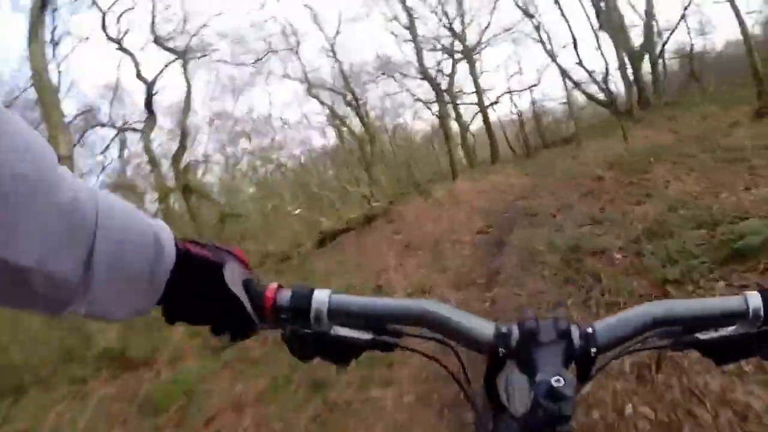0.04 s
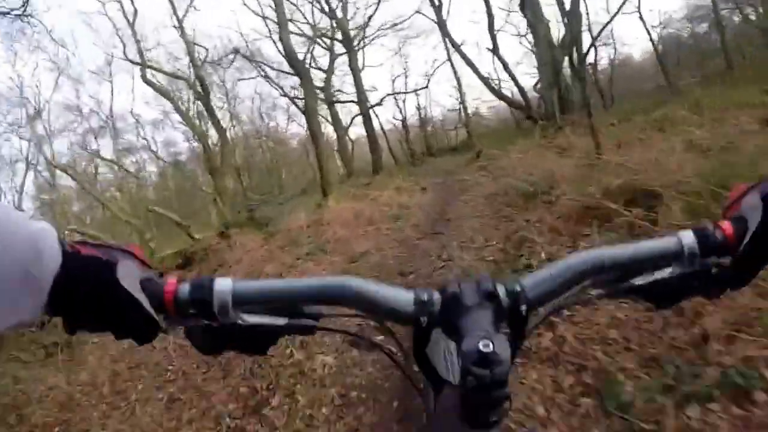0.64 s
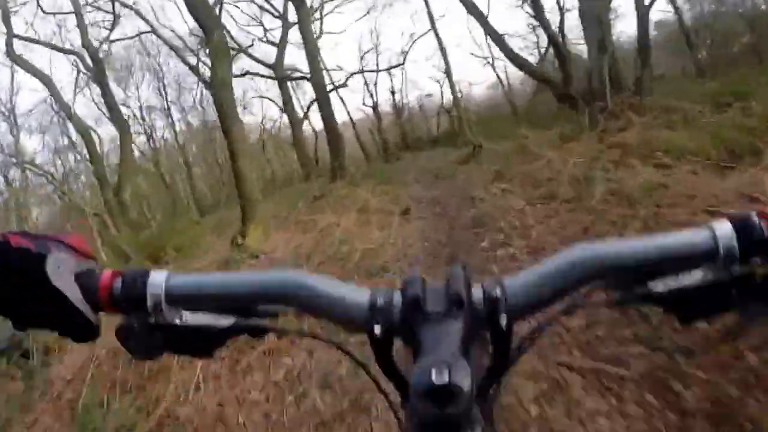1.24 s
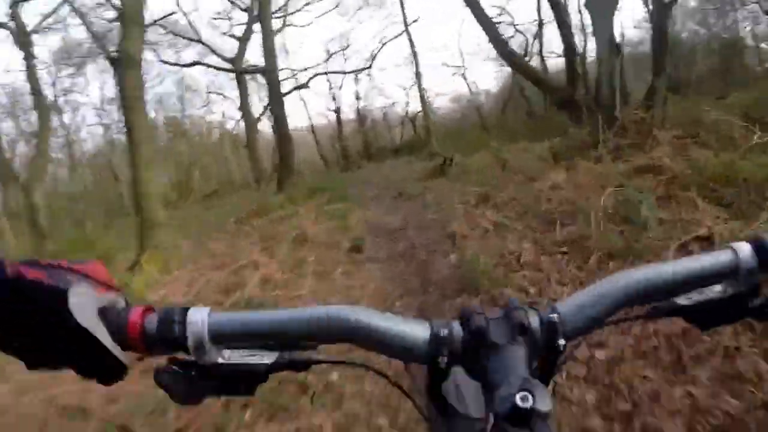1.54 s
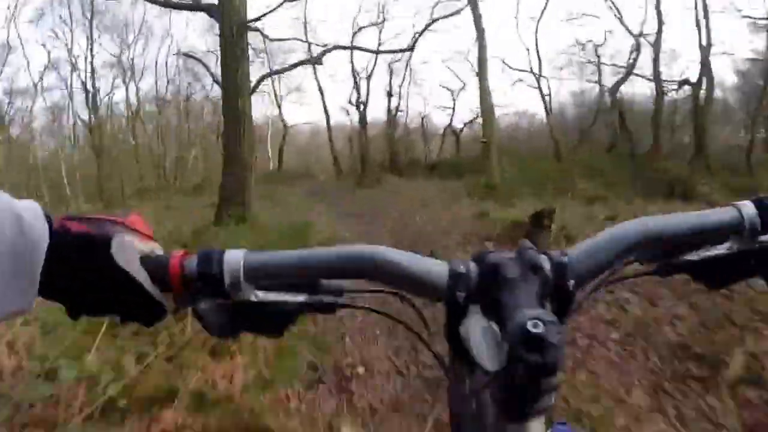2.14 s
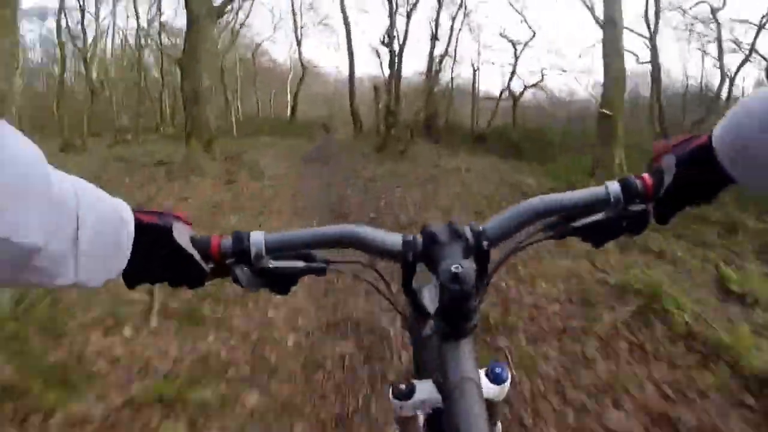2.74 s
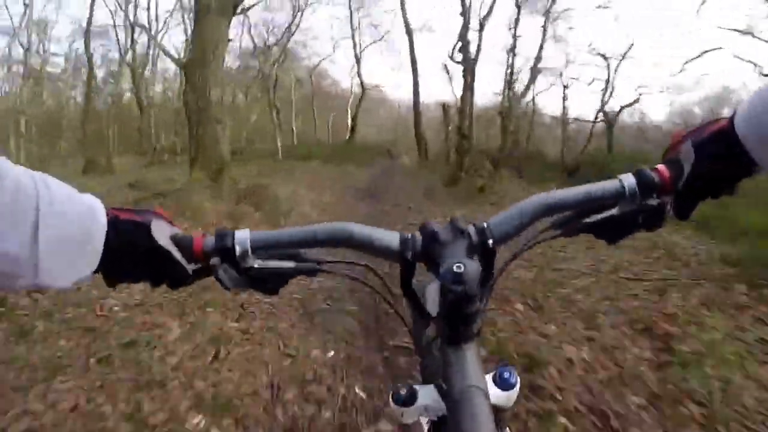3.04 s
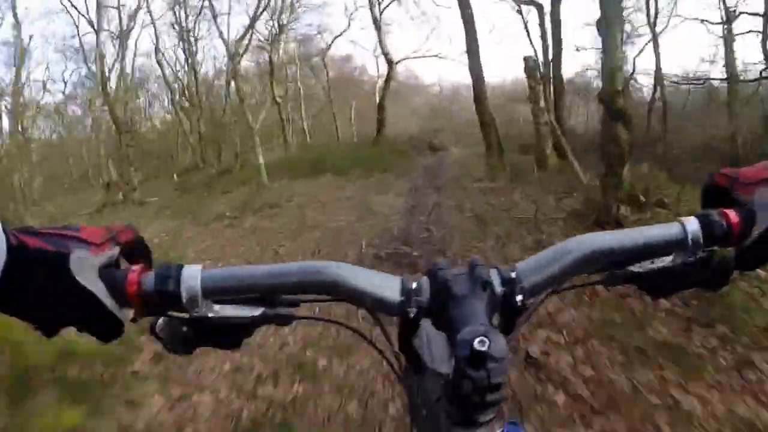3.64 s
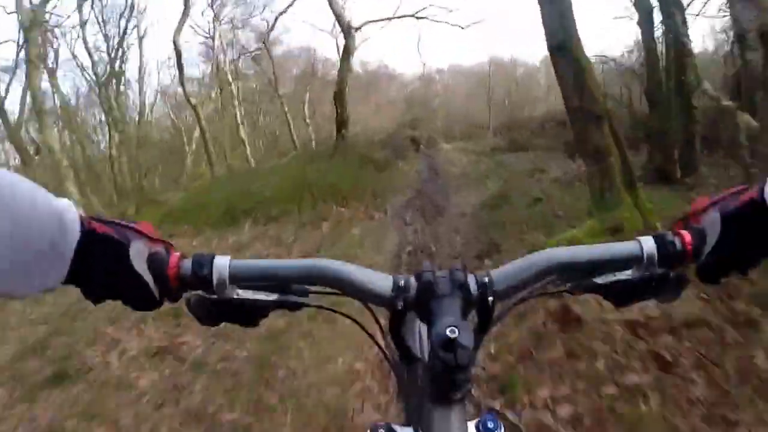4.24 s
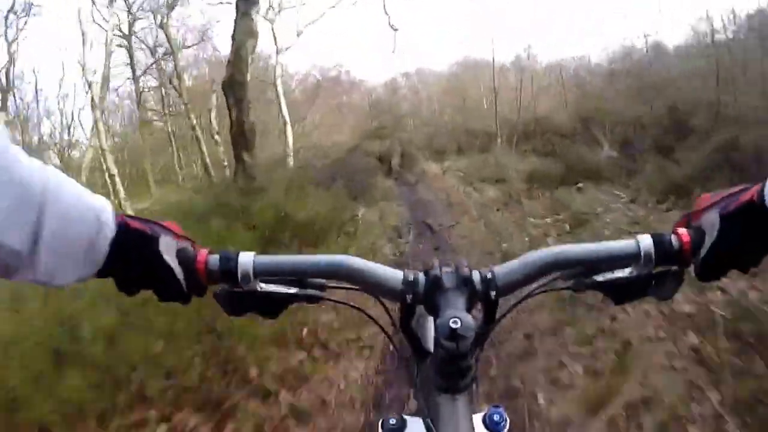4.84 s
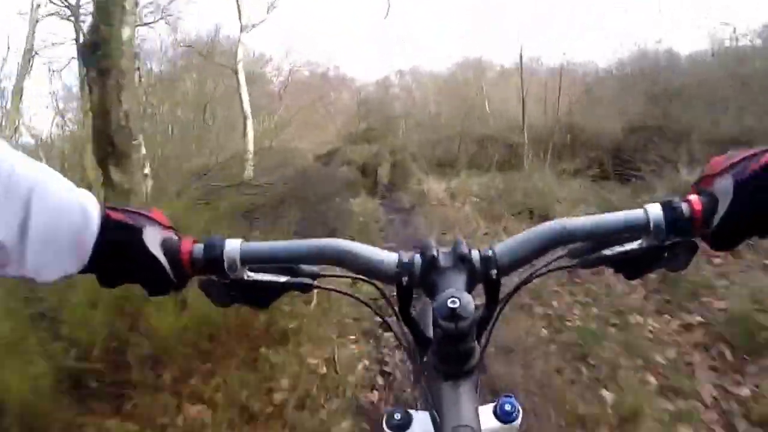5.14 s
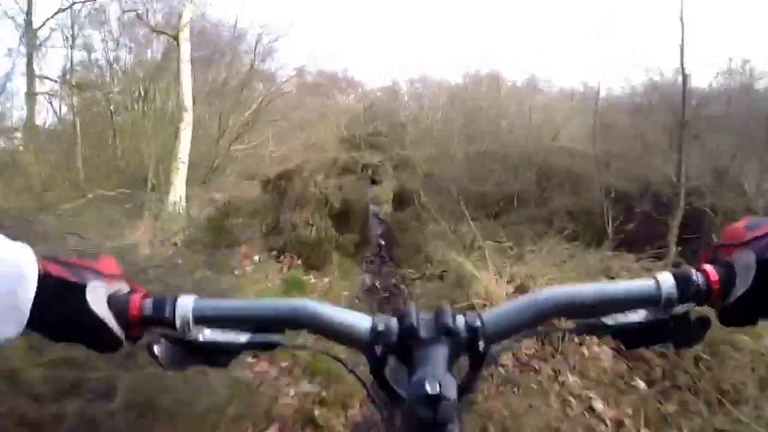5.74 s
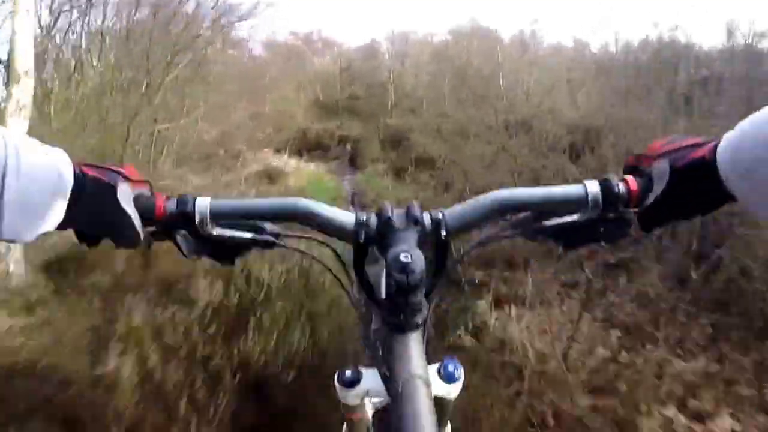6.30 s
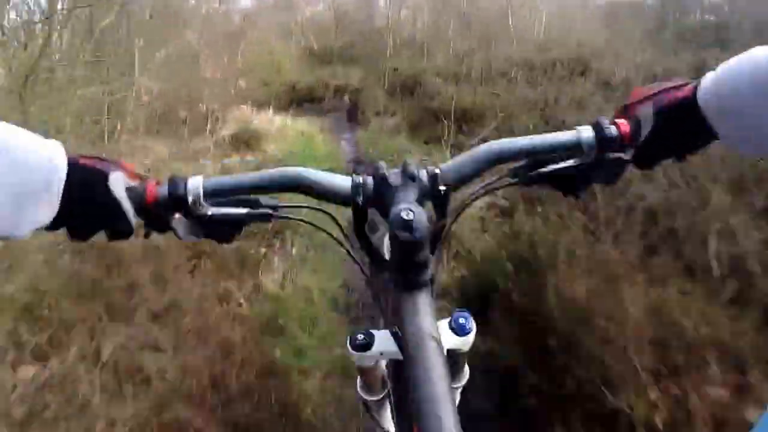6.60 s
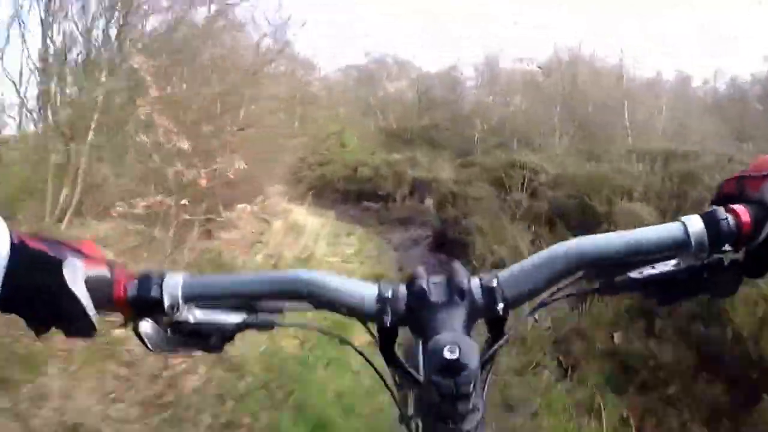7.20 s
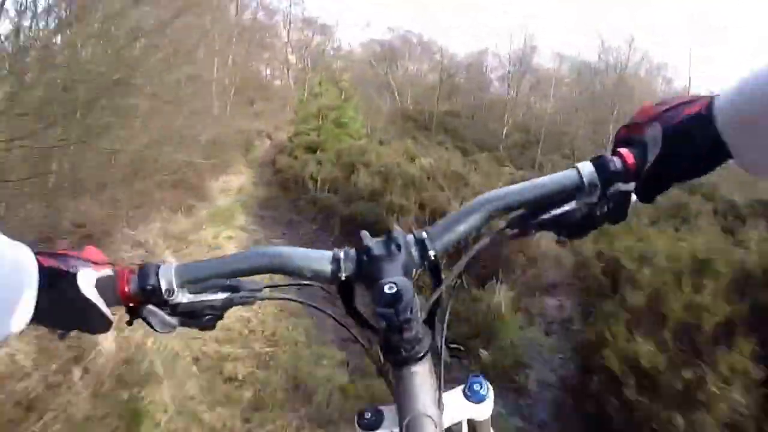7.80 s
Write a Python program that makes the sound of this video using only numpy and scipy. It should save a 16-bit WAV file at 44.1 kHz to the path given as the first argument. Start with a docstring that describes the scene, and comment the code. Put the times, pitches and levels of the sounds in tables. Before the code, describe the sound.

Deep, uneven wind rumble runs under the surging crunch of bike tyres on mud and wet leaves. Loose parts of the bike knock over bumps, twigs and grit snap, and one hard clack lands right by the chest-mounted microphone. The ride grows louder, eases briefly over a crest, then pushes through swishing undergrowth with stronger thumps and clatter. Everything is close, dry and outdoors.

```python
"""A mountain bike rolls down a muddy woodland trail, heard close from a cased camera on the rider's chest.
The tyres crackle through wet leaves in surges, twice a wheel turn, then swish through heather.
Air buffets the case and the ground drums up through the rider, swelling over bumps, sinking over crests.
Loose parts knock on their stops, twigs and grit snap, small hard hits clack near the microphone
and a thin metal part pings. Open air, no echo."""
import sys
import numpy as np
from scipy import signal
from scipy.fft import rfft, irfft, next_fast_len
from scipy.io import wavfile
from scipy.ndimage import uniform_filter1d, minimum_filter1d, map_coordinates

SR = 44100
rng = np.random.default_rng(int(sys.argv[2]) if len(sys.argv) > 2 else 0)


def wav_record(signal):
    """Record a signal, one row per channel, as 16-bit PCM in the file named by sys.argv[1]."""
    frames = np.transpose(np.atleast_2d(signal))
    bounded = np.clip(frames, -1, 1)
    # unit amplitude maps onto the largest positive 16-bit level
    quanta = np.round(bounded * 32767).astype(np.int16)
    wavfile.write(sys.argv[1], SR, quanta)


N = 355424

# under the tyres, leaf litter, a lull near 6 s as the wheels go light, then heather: t/s, crunch/dB, swish/dB
TRAIL_LEVELS = [(0, -53, -56.5), (1.2, -49.5, -54), (2.9, -47, -52.5), (3.5, -46, -51), (4.3, -44.5, -50),
                (4.65, -50, -52.5), (4.93, -44, -43.5), (5.27, -46, -53.5), (5.38, -42, -46),
                (5.82, -53.5, -54), (5.99, -52, -54), (6.06, -41.5, -49), (6.27, -53.5, -56),
                (6.375, -50.5, -56), (6.41, -41, -41.5), (6.66, -38.5, -39), (7.03, -49.5, -41.5),
                (7.27, -44, -38.5), (7.7, -48, -47), (8.05, -39, -42)]
# bumps in the trail, as relative levels: t/s, air pressure on the case/dB, drumming/dB, thump/dB
BUMPS = [(0.172, -14.5, -52, -54), (0.685, -15, -43.5, -55), (0.889, -19, -63, -44.5),
         (0.955, -12.5, -60, -49), (1.162, -24, -50, -37), (1.649, -9.5, -36, -44), (1.918, -17, -48, -54),
         (2.061, -24, -40.5, -60), (2.696, -16.5, -48, -50), (3.199, -12, -45, -53), (3.288, -11, -58, -36),
         (3.771, -15, -59, -56), (4.145, -8.5, -38.5, -33), (4.315, -15, -60, -55),
         (4.548, -13.5, -47, -41), (4.95, -23, -46, -59), (5.322, -8.5, -66, -52), (5.372, -23, -38, -50),
         (5.734, -19, -39.5, -42), (6.051, -10.5, -41, -55), (6.136, -12, -50, -47), (6.419, -11, -36, -45),
         (6.551, -7.5, -40, -31), (6.762, -6.5, -43, -22.5), (6.868, -13.5, -47, -54),
         (7.252, -19, -48, -59), (7.935, -4.5, -43, -25.5)]
PRESSURE, DRUMMING = 1, 2  # columns of BUMPS


def amp(db):
    """Decibels to gain."""
    return 10 ** (np.asarray(db) / 20)


def unit(x):
    """Scale to rms 1."""
    return x / np.sqrt(np.mean(x ** 2) + 1e-20)


def unit_hit(x):
    """Scale a short sound to rms 1 as if packed into 10 ms."""
    return x / np.sqrt(np.sum(x ** 2) / (SR / 100))


def curves(rows):
    """One value per sample for each column after the time."""
    times, *columns = np.transpose(rows)
    return [np.interp(np.arange(N) / SR, times, column) for column in columns]


def wobble(rate):
    """A smooth random curve, rate knots a second."""
    knots = rng.standard_normal(int(N * rate / SR) + 4)
    return map_coordinates(knots, [np.arange(N) * rate / SR])


def colour(x, spectrum):
    """Minimum-phase filter through the points f/Hz, level/dB."""
    size = 2 * next_fast_len(len(x))
    hz, db = np.transpose(spectrum)
    gain_db = np.interp(np.log(np.fft.rfftfreq(size, 1 / SR) + 1), np.log(hz), db)
    cepstrum = irfft(np.log(amp(gain_db)))
    cepstrum[1:size // 2] *= 2
    cepstrum[size // 2 + 1:] = 0
    return irfft(rfft(x, size) * np.exp(rfft(cepstrum)))[:len(x)]


def grains(rate, spread_db):
    """Random tiny impulses of uneven size, rate a second, rms 1."""
    impulses = (rng.random(N) < rate / SR) * rng.choice([-1, 1], N)
    return unit(impulses * amp(spread_db * np.clip(rng.standard_normal(N), -2, 2)))


def patchy(x, depth_db):
    """Let each narrow band flicker on its own, in patches some hundredths of a second long."""
    bands = signal.stft(x, nperseg=256)[2]
    flicker = rng.standard_normal(bands.shape)
    for _ in range(2):
        flicker = uniform_filter1d(uniform_filter1d(flicker, size=4, axis=0), size=5, axis=1)
    return signal.istft(bands * amp(depth_db * unit(flicker)), nperseg=256)[1][:N]


def fade(t60):
    """A quarter second of exponential decay, falling 60 dB in t60 seconds."""
    return np.exp(-np.log(1000) * np.arange(SR // 4) / SR / t60)


def burst(spectrum, t60, rough=1):
    """A coloured contact: the share rough is dying scrape, the rest one clean tap."""
    decay = fade(t60)
    scrape = unit_hit(decay * rng.standard_normal(len(decay)))
    tap = unit_hit(signal.unit_impulse(len(decay)))
    return unit_hit(colour(rough * scrape + (1 - rough) * tap, spectrum))


def ring(modes, attack_s, scatter_db=2.8):
    """Damped modes, struck at new strengths and slightly new pitches each time."""
    t = np.arange(SR // 4) / SR
    detunes = 1 + .012 * rng.standard_normal(len(modes))
    tones = np.zeros(len(t))
    for detune, (hz, db, t60) in zip(detunes, modes):
        strength = amp(db + scatter_db * rng.standard_normal())
        tones += strength * fade(t60) * np.sin(2 * np.pi * hz * detune * t)
    return unit_hit(tones * (1 - np.exp(-t / attack_s)))


def add(track, s, sound):
    """Mix a sound into the track at s seconds."""
    part = track[max(round(s * SR), 0):][:len(sound)]
    part += sound[:len(part)]


def bump_swell(column, rise_s=.032, fall_s=.045):
    """A gain that swells into each bump and eases after it, as high as that column of BUMPS."""
    t = np.linspace(0, N / SR, 4000)
    gain = np.zeros(len(t))
    for bump in BUMPS:
        since = t - bump[0]
        gain += amp(bump[column]) * np.exp(-(since / np.where(since < 0, rise_s, fall_s)) ** 2)
    return np.interp(np.arange(N) / SR, t, gain)


def crest_lulls(width_s=.046):
    """A gain that sinks while the bike goes light over a crest."""
    # lulls and one slight swell: t/s, gain/dB
    crests = [(1.04, -6.5), (1.5, 2), (2.4, -1.5), (4.78, -7.5), (5.1, -3), (5.86, -13), (7.07, -4)]
    t = np.arange(N) / SR
    return amp(sum(db / (1 + ((t - s) / width_s) ** 2) ** 2 for s, db in crests))


def rumble():
    """Air buffets the case while the ground drums up through bike and rider, both harder over bumps."""
    # airflow past the case: t/s, level/dB
    airflow = [(0.0, -29.5), (0.38, -32), (0.83, -31.5), (1.14, -31), (2.02, -27), (2.33, -28),
               (3.23, -26.5), (3.55, -31.5), (4.31, -27), (4.98, -28.5), (5.32, -25.5), (5.95, -26.5),
               (6.46, -21.5), (7.25, -29), (8.06, -22)]
    # spectra of the buffeting and the drumming: f/Hz, level/dB
    air_spectrum = [(8, -8), (21, -1.5), (31, -5.5), (39, -7), (50, -14.5), (62, -19), (100, -35),
                    (200, -60), (500, -120)]
    ground_spectrum = [(35, -14), (70, -8.5), (110, -1.5), (170, -8), (250, -16.5), (400, -29.5),
                       (900, -35.5), (2500, -100)]
    wind_db, = curves(airflow)
    crunch_db, _ = curves(TRAIL_LEVELS)
    air = signal.hilbert(colour(rng.standard_normal(N), air_spectrum))
    air_power = uniform_filter1d(np.abs(air) ** 2, size=4000)
    air = unit(air.real / np.sqrt(air_power))  # steadied, so it swells only with the ride
    ground = unit(colour(rng.standard_normal(N), ground_spectrum))
    sway = wobble(11)
    ground_db = -47.5 + .48 * (crunch_db - crunch_db.mean())  # rougher ground drums harder
    air_gain = np.hypot(amp(wind_db + 2.5 * sway), amp(-12) * bump_swell(PRESSURE))
    ground_gain = np.hypot(amp(ground_db + 1.7 * sway), bump_swell(DRUMMING))
    return crest_lulls() * (air_gain * air + ground_gain * ground)


def wheel_surge(first_s=.043, sharpness=3.5, fast_depth=.42):
    """A swell twice a wheel turn, 1 high on slow going and shallower at speed."""
    # the bike gathers speed on the slope, then holds it: t/s, wheel speed/(turns/s)
    wheel_speed = [(1.1, 1.925), (2.0, 2.395)]
    speed, = curves(wheel_speed)
    turns = np.cumsum(speed) / SR - first_s * speed[0]
    depth = np.interp(speed, [speed.min(), speed.max()], [1, fast_depth])
    return depth * np.abs(np.cos(2 * np.pi * turns)) ** sharpness


def case_ticks(rate):
    """Sparse bits of leaf and grit ring the hollows of the case, each hollow rate times a second."""
    # modes of the hollows: f/Hz, level/dB, t60/s
    hollows = [(1443, 4.5, 0.03), (1557, -13, 0.049), (2240, 3, 0.054), (2846, 0.5, 0.0067),
               (5500, -1, 0.015)]
    t = np.arange(SR // 4) / SR
    tones = [amp(db) * unit_hit(fade(t60) * np.sin(2 * np.pi * hz * t)) for hz, db, t60 in hollows]
    return unit(sum(signal.fftconvolve(grains(rate, spread_db=4), tone)[:N] for tone in tones))


def tyres():
    """Knobs crush mud and leaves in clumps and flick grit; undergrowth sweeps along wheels and legs."""
    # spectra of crushed litter, brushing leaves and heather, and scraping grit: f/Hz, level/dB
    crunch_spectrum = [(120, -27.5), (300, -3.5), (550, -8), (790, -5.5), (1020, -11.5), (1250, -8),
                       (1480, 1.5), (1830, -6.5), (2250, 0), (2550, -5), (2900, -3), (3500, -17.5),
                       (6200, -16.5), (8000, -63)]
    swish_spectrum = [(500, -47), (1200, -31), (2000, -13), (2900, 4.5), (3500, -3.5), (4500, 0),
                      (5000, -2.5), (6200, -3), (7000, -15), (8300, -20.5), (10000, -17.5), (12500, -25.5),
                      (15000, -35)]
    grit_spectrum = [(900, -25), (1500, -1.5), (1900, -3.5), (2900, 16.5), (3600, 1), (6100, -1.5),
                     (7200, -15), (10500, -14), (15000, -32)]
    crunch_db, swish_db = curves(TRAIL_LEVELS)
    load = bump_swell(DRUMMING)
    surge = wheel_surge()
    surge -= surge.mean()
    clumps = amp(1.1 * wobble(60))
    crushing = grains(rate=700, spread_db=3.5) + rng.standard_normal(N)
    crunch = unit(patchy(colour(crushing, crunch_spectrum), depth_db=2.5))
    crunch = unit(crunch + amp(-4.5) * case_ticks(rate=16))
    brushing = grains(rate=1200, spread_db=4.5) + rng.standard_normal(N)
    swish = unit(patchy(colour(brushing, swish_spectrum), depth_db=3))
    # every piece of grit scrapes for a few milliseconds
    scrapes = signal.fftconvolve(np.abs(grains(rate=22, spread_db=5)), fade(.014))[:N]
    grit = unit(colour(scrapes * rng.standard_normal(N), grit_spectrum))
    grit_db = np.minimum(swish_db, -50) - 2.5 + 3.5 * surge  # follows the swish up to a cap
    crunch_gain = np.hypot(amp(crunch_db + 2.5 * surge + wobble(16)), amp(-10.5) * load)
    swish_gain = np.hypot(amp(swish_db + 5 * surge), amp(-19) * load)
    return clumps * (crunch_gain * crunch + swish_gain * swish) + amp(grit_db) * grit


def jolts(width_s=.0099, thump_lead_s=.01368):
    """Each bump thumps the rider and squeezes the air at the case: a push, a deep pull and a rebound."""
    # spectrum of the soft thump: f/Hz, level/dB
    thump_spectrum = [(40, -4), (90, 3.5), (170, -6.5), (300, -16), (600, -34.5), (2000, -61)]
    out = np.zeros(N)
    u = np.arange(-SR // 10, SR // 10) / SR / width_s
    pulse = (.5 * u ** 2 - 1) * np.exp(-u ** 2 / 3.23)  # centred 0.1 s in
    for s, pressure_db, _, thump_db in BUMPS:
        add(out, s - .1, amp(pressure_db) * pulse)
        add(out, s - thump_lead_s, amp(thump_db + 4.5) * burst(thump_spectrum, t60=.077))
    return out


def knocks(rebound_s=.002768, settle_s=.009):
    """Loose parts hit their stops with a thud and a crack, rebound with a hard ring, then settle."""
    # the hits, as relative levels: t/s, boom/dB, frame knock/dB, ring/dB
    hits = [(0.2434, -52, -41, -46.5), (1.845, -23, -32, -23), (2.7325, -24.5, -28, -31.5),
            (2.772, -39, -58, -34.5), (3.2881, -24.5, -31, -27), (3.9198, -32, -36, -46),
            (4.072, -25, -26, -23.5), (4.531, -39.5, -56, -61), (5.752, -36.5, -45, -60),
            (5.9279, -31, -27, -23.5), (6.6188, -25.5, -32.5, -33), (6.8555, -21.5, -22, -20.5),
            (7.3978, -60, -56, -31), (7.4495, -18, -23.5, -21), (7.7943, -32.5, -28.5, -34.5),
            (7.8746, -25, -32, -36), (7.983, -22.5, -29, -22)]
    # modes of the booming parts, the frame and a part on its stop: f/Hz, level/dB, t60/s
    boom_modes = [(177, -7.5, 0.063), (258, -3, 0.021), (444, -5, 0.036), (541, 1.5, 0.016)]
    frame_modes = [(689, -8.5, 0.078), (823, 5.5, 0.023), (926, -0.5, 0.015), (1127, -11.5, 0.036)]
    stop_modes = [(1540, 5, 0.012), (2065, -4.5, 0.04), (2155, 4, 0.021), (2200, -16, 0.0048),
                  (2540, -19, 0.0038)]
    # spectra of a hit, dull to bright: f/Hz, level/dB
    thud_spectrum = [(50, -20), (140, 7), (300, -2), (600, -0.5), (900, -20), (1500, -5), (4000, -71)]
    contact_spectrum = [(500, -18.5), (1100, -4.5), (1450, 8), (1720, -8.5), (2100, 4), (2700, -1),
                        (3200, -30.5), (7000, -62.5)]
    crack_spectrum = [(900, -61.5), (1800, 1), (2800, 12.5), (3300, -2.5), (4050, 5.5), (4800, -8.5),
                      (5700, -7), (6700, -15), (10200, -24.5), (12000, -42), (15000, -50)]
    out = np.zeros(N)
    for s, boom_db, frame_db, ring_db in hits:
        boom = ring(boom_modes, attack_s=.00036)
        thud = burst(thud_spectrum, t60=.0072, rough=.48)
        add(out, s, amp(boom_db) * unit_hit(boom + 1.27 * thud))
        add(out, s, amp(frame_db) * ring(frame_modes, attack_s=.00072))
        add(out, s, amp(ring_db - 2) * burst(contact_spectrum, t60=.018, rough=.55))
        add(out, s, amp(ring_db - 3) * burst(crack_spectrum, t60=.015, rough=.68))
        add(out, s + rebound_s, amp(ring_db - 3) * ring(stop_modes, attack_s=.00044))
        settle = unit_hit(burst(thud_spectrum, t60=.016) + ring(frame_modes, attack_s=.00055))
        add(out, s + settle_s * rng.uniform(.686, 1.4), amp(boom_db - 16.5) * settle)
    return out


def twig_snaps(t60=.022):
    """Twigs break and grit flicks the frame; small snaps come with the surges, louder on rough ground."""
    # the loudest twigs and stones, as relative levels: t/s, body/dB, fizz/dB
    loud_snaps = [(0.276, -41.5, -60.5), (0.545, -47, -65), (0.781, -43, -61), (1.061, -45, -74),
                  (2.2664, -41, -52), (2.1767, -53, -56.5), (2.6278, -40, -59), (3.159, -38, -44.5),
                  (3.2142, -34, -49), (3.3685, -36, -61), (3.468, -35, -68), (3.5243, -34.5, -58),
                  (3.7276, -35, -60), (4.3054, -41, -46), (4.3603, -43, -55), (4.503, -36, -61),
                  (5.161, -39.5, -58), (5.3058, -38, -67), (5.343, -37, -55), (5.537, -38, -36.5),
                  (6.2765, -59, -55), (6.323, -46, -55), (6.8086, -33.5, -54), (7.8608, -39.5, -46)]
    # spectra of a snap's body and its fizz: f/Hz, level/dB
    body_spectrum = [(100, -58), (1000, -37), (1500, 11), (1850, -13), (2300, 7), (3000, 10.5), (3600, -5),
                     (4500, -3.5), (6200, 2), (7200, -42), (12000, -34)]
    fizz_spectrum = [(2500, 5.5), (4500, 9.5), (6100, 8.5), (7300, -1), (10500, -4.5), (15000, -15)]
    out = np.zeros(N)
    crunch_db, _ = curves(TRAIL_LEVELS)
    snaps_per_s = 6 * wheel_surge()
    starts = np.flatnonzero(rng.random(N) < snaps_per_s / SR)
    small_snaps = [(i / SR, crunch_db[i] + 2.5, crunch_db[i] - 20) for i in starts]
    for s, body_db, fizz_db in loud_snaps + small_snaps:
        add(out, s, amp(body_db) * burst(body_spectrum, t60, rough=.7))
        add(out, s, amp(fizz_db + 10) * burst(fizz_spectrum, t60))
    return out


def case_clacks():
    """A small hard hit close to the microphone cracks sharply and rings the case, with no thud."""
    # the hits, as relative levels: t/s, ring/dB, crack/dB
    hits = [(1.7965, -12.5, -17.5), (1.9682, -35, -47)]
    # modes of the case: f/Hz, level/dB, t60/s
    case_modes = [(1670, 0, 0.028), (1860, -25, .2), (2067, 5, 0.014), (2180, 6, 0.019), (4240, -32, 0.047),
                  (5940, -31, .022)]
    # spectrum of the crack: f/Hz, level/dB
    crack_spectrum = [(200, -26), (1100, -24), (1700, -4), (2800, -2), (3500, 2), (4400, 2), (5000, -3),
                      (6300, -4.5), (7200, -29), (15000, -42)]
    out = np.zeros(N)
    for s, ring_db, crack_db in hits:
        add(out, s, amp(ring_db + .5) * ring(case_modes, attack_s=.0007, scatter_db=.8))
        add(out, s, amp(crack_db + 2) * burst(crack_spectrum, t60=.013, rough=.6))
    return out


def metal_pings():
    """A thin metal part rings on after a tap."""
    # light taps: t/s, level/dB
    taps = [(3.214, -35.5), (3.522, -31)]
    # modes of the part: f/Hz, level/dB, t60/s
    metal_modes = [(2520, -14, .17), (2864, 4.5, .19), (4150, -6, .04)]
    out = np.zeros(N)
    for s, db in taps:
        add(out, s, amp(db) * ring(metal_modes, attack_s=.00055, scatter_db=3))
    return out


def scene():
    """One microphone at chest height; every source rides along with it, close and dry."""
    return (rumble() + jolts() + tyres() + knocks() + case_clacks() + metal_pings() + twig_snaps())[None]


def record(dry):
    """The camera keeps nothing above its band limit, and a fast limiter holds peaks under full scale."""
    top_hz, ceiling = 15400, .96
    size = next_fast_len(N + SR // 2)
    passband = np.fft.rfftfreq(size, 1 / SR) < top_hz
    heard = irfft(rfft(dry, size) * passband, size)[..., :N]
    limiter_gain = ceiling / np.maximum(np.abs(heard), ceiling)
    return heard * uniform_filter1d(minimum_filter1d(limiter_gain, size=13), size=13)


dry = scene()
out = record(dry)
wav_record(out)
```